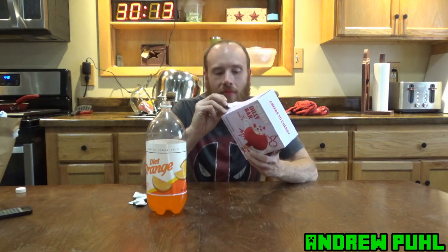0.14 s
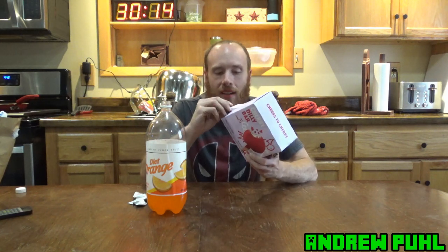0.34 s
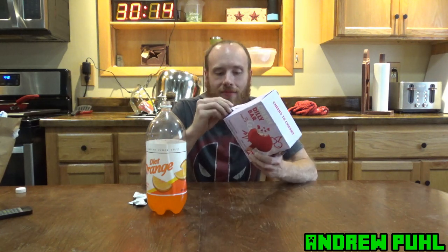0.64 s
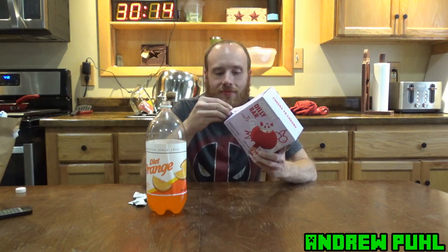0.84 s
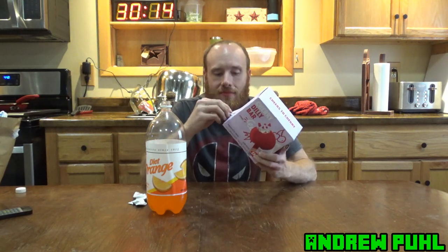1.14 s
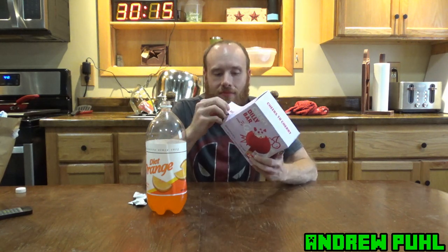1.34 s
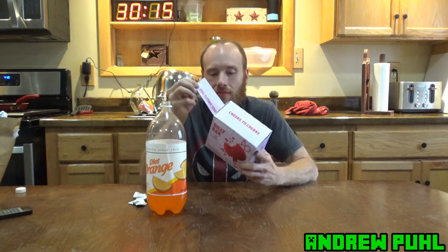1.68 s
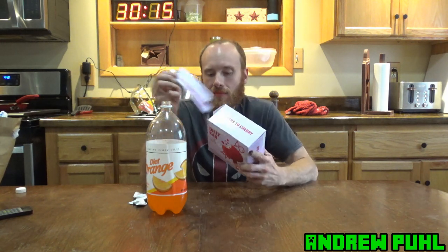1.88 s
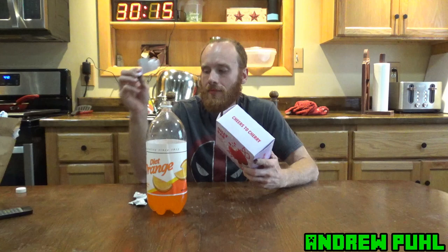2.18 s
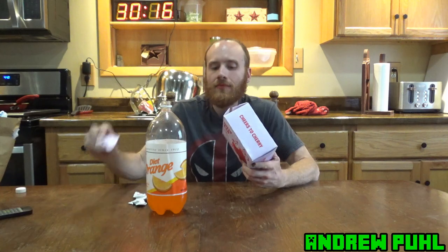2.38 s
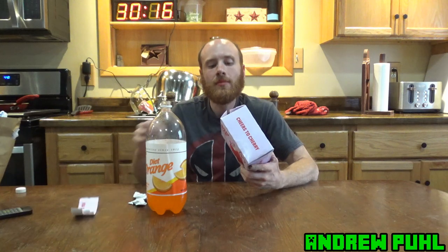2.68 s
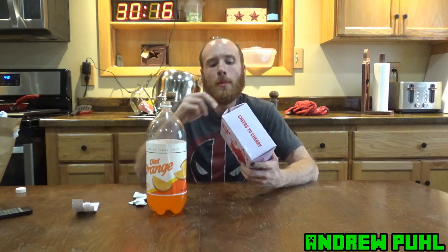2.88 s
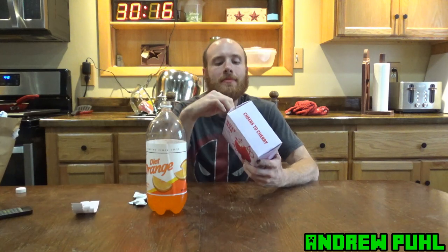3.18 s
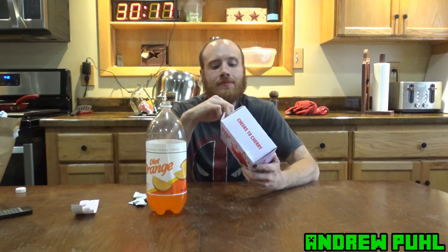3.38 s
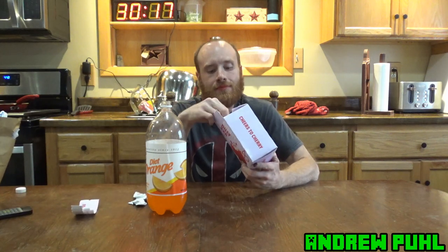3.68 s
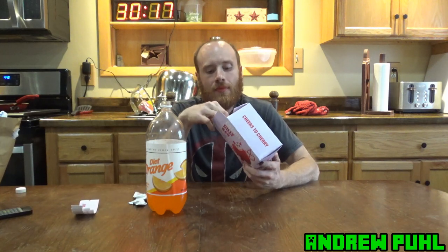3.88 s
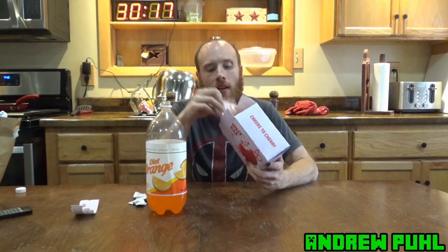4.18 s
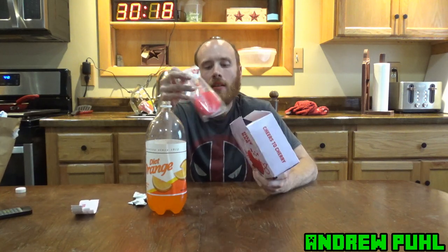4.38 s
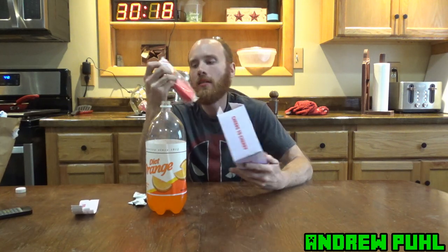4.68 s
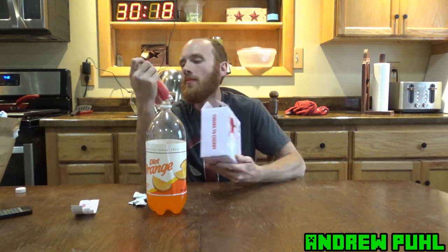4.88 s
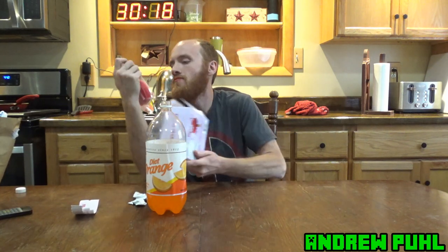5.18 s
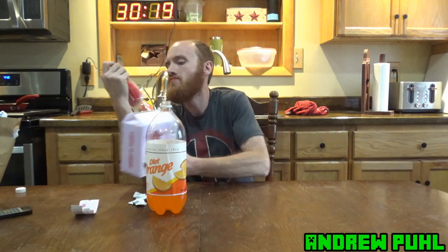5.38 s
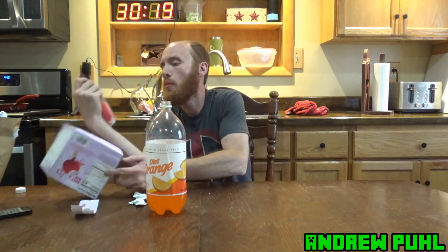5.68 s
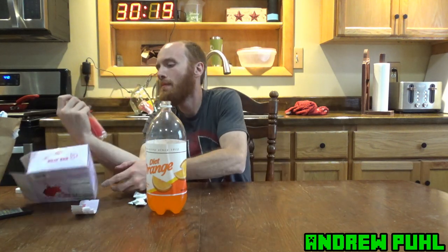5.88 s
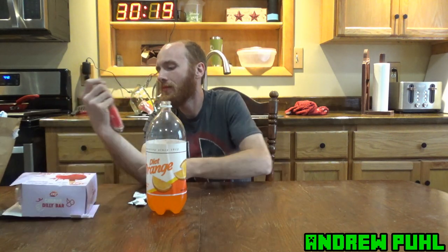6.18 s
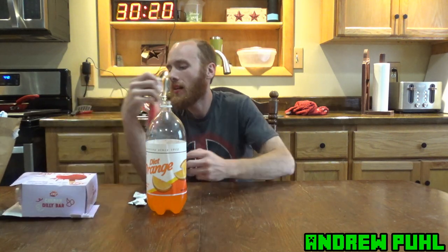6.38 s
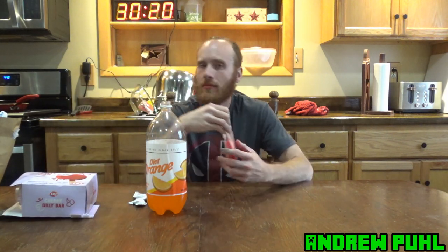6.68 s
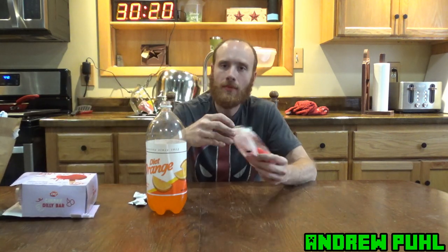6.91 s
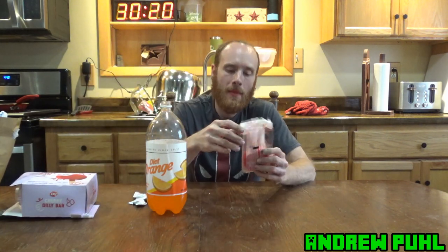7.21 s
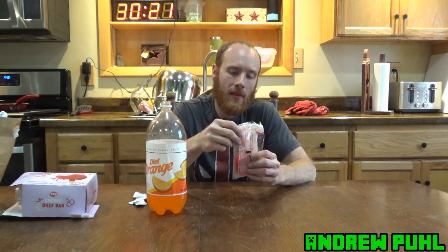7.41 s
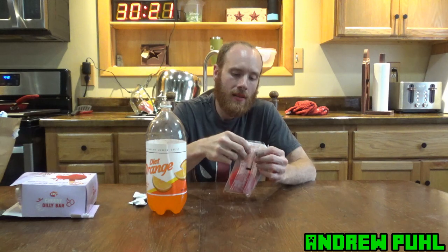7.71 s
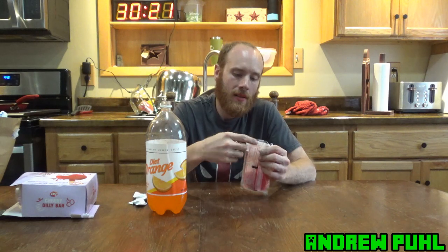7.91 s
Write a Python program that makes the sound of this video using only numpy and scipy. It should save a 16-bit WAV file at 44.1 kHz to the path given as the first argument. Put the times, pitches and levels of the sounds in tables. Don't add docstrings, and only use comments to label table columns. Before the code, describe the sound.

Card taps, a quick ripping burst, crisp wrapper crackle, a box landing and scraping on a table, then more busy film crinkling, close and indoors.

```python
import sys
import numpy as np
from scipy import signal
from scipy.fft import rfft, irfft, next_fast_len
from scipy.io import wavfile
from scipy.ndimage import map_coordinates

SR = 44100
rng = np.random.default_rng(int(sys.argv[2]) if len(sys.argv) > 2 else 0)


def log_audio(samples):
    frames = np.atleast_2d(samples).T
    limited = np.clip(frames, -1, 1)
    pcm = np.round(limited * 32767).astype(np.int16)
    wavfile.write(sys.argv[1], SR, pcm)


def volts_from_db(level):
    exponent = np.asarray(level, float) / 20
    return 10 ** exponent


N = 355005

# [f/Hz, level/dB per Hz]
GRIT_COLOUR = [(500, -18), (1200, 0), (2200, 10), (3500, 2.5), (6000, 4.5), (9000, -1), (12000, -18),
               (16500, -103)]


def unit(x):
    return x / np.sqrt(np.mean(x ** 2) + 1e-20)


def along(points, hz):
    f, v = np.transpose(points)
    return np.interp(np.log(hz + 1), np.log(f + 1), v)


def wobble(rate):
    at = np.arange(0, N + 64, 64)
    knots = rng.standard_normal(int(N * rate / SR) + 4)
    return np.interp(np.arange(N), at, map_coordinates(knots, [at * rate / SR]))


def filtered(x, response):
    m = next_fast_len(N + SR // 2)
    return irfft(rfft(x, m) * response(np.fft.rfftfreq(m, 1 / SR)), m)[..., :N]


def causal(points):
    def response(f):
        cepstrum = irfft(along(points, f) * np.log(10) / 20)
        cepstrum[1:len(cepstrum) // 2] *= 2
        cepstrum[len(cepstrum) // 2 + 1:] = 0
        return np.exp(rfft(cepstrum))
    return response


def body(modes):
    def response(f):
        total = 0
        for k, (centre, width, db) in enumerate(modes):
            damping = 1j * f * width
            total = total + (-1) ** k * volts_from_db(db) * damping / (centre * centre - f * f + damping)
        return total
    return response


def resonant(noise, hz, width):
    return unit(signal.lfilter(*signal.iirpeak(min(hz, SR / 3), 1 / width, SR), noise))


def grains(per_s, spread_db, clump_db, life):
    strength = np.minimum(rng.exponential(size=N), 2.2)
    happens = rng.random(N) < per_s / SR
    size = volts_from_db(spread_db * strength + clump_db * wobble(40)) * happens
    puff = signal.lfilter([1], [1, -np.exp(-1 / (life * SR))], size)
    return unit(puff * rng.standard_normal(N) / np.sqrt(per_s))


def strokes(rows, rise_db_s, fall_db_s):
    s = np.arange(0, N / SR, 1 / 2000)
    power = 0
    for at, hold, db in rows:
        rise = rise_db_s * np.maximum(at - s, 0)
        fall = fall_db_s * np.maximum(s - at - abs(hold), 0)
        power = power + volts_from_db(db - rise - fall) ** 2
    return np.interp(np.arange(N) / SR, s, np.sqrt(power))


def air():
    # [f/Hz, level/dB per Hz]
    air_colour = [(12, -36), (20, -3.5), (48, -12.5), (79, -5.5), (139, -8), (230, -5.5), (506, -10.5),
                  (1690, -15.5), (7100, -22), (7730, -23), (10800, -28), (15200, -27.5), (16500, -35)]
    # [f/Hz, level/dB rms]
    hum_partials = [(120, -66), (242, -89)]
    noise = rng.standard_normal((2, N))
    mid, side = filtered(noise, lambda f: volts_from_db(along(air_colour, f)) * [1 + 0 * f, f / (f + 45)])
    tone = volts_from_db(-58.5 + 0.29 * wobble(4.79)) * unit(np.array([mid + side / 2, mid - side / 2]))
    t = np.arange(N) / SR
    hum = sum(volts_from_db(db - 10 + 0.8 * wobble(7.2)) * np.sin(2 * np.pi * hz * t) for hz, db in hum_partials)
    return tone + hum


def panels(f):
    # [f/Hz, width/Hz, level/dB]
    box_modes = [(240, 273, -7.5), (389, 208, -2.5), (700, 330, -6.5), (1100, 336, -5.5),
                 (1358, 730, -12.5), (2200, 105, -18.5)]
    return body(box_modes)(f) * body([(750, 3500, 0)])(f)


def cracks(events, life, width, settle_db, settle, boom_life, boom_db):
    # [f/Hz, level/dB]
    edge_colour = [(600, -16.5), (1500, -6), (3000, -2), (9500, -1.5), (12000, -14.5), (16500, -15.5)]
    crack, push, t = np.zeros(N + SR), np.zeros(N + SR), np.arange(SR // 16) / SR
    for s, db, rel_db, hz, boom_hz in events:
        snap, shove, rustle = rng.standard_normal((3, len(t)))
        start = round(s * SR)
        second_hz = hz * 1.81 ** np.sign(6500 - hz)
        burst = resonant(snap, hz, width) + 0.37 * resonant(snap, second_hz, width) + 0.41 * snap
        burst = burst * t * np.exp(-t / life)
        after = volts_from_db(settle_db) * rustle * np.exp(-t / settle) * (1 - np.exp(-t / 0.00013))
        crack[start:][:len(t)] += volts_from_db(db) * (burst / np.abs(burst).max() + after)
        decay = np.exp(-t / boom_life) + 0.11 * np.exp(-t / (4 * boom_life))
        shake = resonant(shove, boom_hz, 0.24) * (1 - np.exp(-t / 0.00019)) * decay
        push[start:][:len(t)] += volts_from_db(db + rel_db + boom_db) * shake / np.linalg.norm(shake)
    return filtered(crack[:N], causal(edge_colour)) + filtered(push[:N], panels)


def card():
    # [t/s, crack peak level/dB, box boom over crack/dB, crack f/Hz, boom f/Hz]
    taps = [(0.0772, -27, 4, 3080, 1200), (0.2186, -21, -10, 3900, 970), (0.234, -8, 3, 2200, 1250),
            (0.3502, -14, -15.5, 5400, 1150), (0.63, -37.5, 0, 2450, 700), (0.6534, -32.5, -10, 6140, 610),
            (0.7113, -32, 1, 2500, 700), (0.9247, -35, 9, 4400, 646), (0.943, -37, 13.5, 5750, 690),
            (0.9687, -36.5, 7, 5270, 735), (1.078, -42, 6, 2400, 626), (1.3456, -33.5, -3.5, 2540, 1150),
            (1.3783, -36, -25, 5910, 692)]
    tabs = [(1.4434, -10, 0.5, 2860, 610), (1.4831, -8.5, -0.5, 2550, 680), (1.5259, -14, 1.5, 2360, 626),
            (1.549, -17, -20, 5600, 900), (1.5557, -6.5, -6.5, 5900, 555), (1.5856, -6, -4, 6050, 630),
            (1.6146, -9, -11, 4840, 650), (1.6434, -8.5, -1, 2260, 665), (1.6724, -7.5, -7, 2300, 700),
            (1.703, -10, -5, 2370, 660), (1.7552, -9.5, -4, 2850, 700), (1.8025, -6, -29, 5940, 519),
            (1.8362, -12, 0, 2900, 746), (1.9325, -6, -22, 2600, 700), (1.956, -8, -0.5, 2500, 764),
            (1.903, -11.5, 1.5, 3000, 700), (1.983, -15, -12, 2480, 700), (2.171, -35, -20, 6000, 700)]
    knocks = [
        (2.1415, -29.5, -11, 5070, 1260),
        (2.4164, -39.5, -15, 5580, 357),
        (2.5793, -22, -14, 3400, 500),
        (3.1479, -34, -5, 2200, 756),
        (3.1914, -26, 2, 1910, 745),
        (3.2803, -33.5, 7.5, 2460, 640),
        (3.322, -31.5, -5, 2300, 638),
        (3.533, -40, 4.5, 2400, 750),
        (3.5123, -34, -19, 6810, 736),
        (5.678, -25.5, 15.5, 2500, 407),
    ]
    jolts = [(5.6834, -14.5, -6, 5270, 315), (5.7144, -20.5, 9, 2200, 223), (5.7264, -16.5, 2, 3490, 242),
             (5.7594, -10.5, -10, 1500, 810), (5.8924, -30, 7, 1570, 910), (5.9444, -22, 12, 2010, 206),
             (5.9634, -18, 5, 2340, 690), (6.0114, -29, -6, 2100, 845), (6.0924, -10, -14, 2540, 635),
             (6.1064, -11, -0.5, 2970, 616), (6.1174, -8.5, 4.5, 1500, 1020), (6.1364, -18, 8, 2250, 511),
             (6.1504, -16.5, 4, 1670, 616), (6.19, -18, -10, 3300, 657), (6.2644, -40, -6, 3180, 501)]
    fidgets = [(0.4743, -34, -12, 5160, 670), (0.4894, -38, -2.5, 5400, 759), (0.6844, -46, 3, 2530, 651),
               (0.7444, -40.5, 3, 5680, 700), (0.7746, -38.5, 1, 5790, 511), (0.8194, -38, 1, 6100, 506),
               (0.8624, -41.5, 2, 3710, 673), (0.999, -51, 5, 1500, 541), (5.099, -45.5, 7.5, 2050, 840),
               (5.1801, -36, 4, 6910, 746), (5.25, -50, -4, 1680, 600), (5.3677, -31.5, 2, 5570, 721),
               (5.4194, -35.5, 8, 2850, 720), (5.469, -41, 6, 3700, 915), (5.5194, -32, 2, 2410, 705)]
    events = list(taps) + list(tabs) + list(knocks) + list(jolts) + list(fidgets)
    hits = cracks(events, life=0.0011, width=0.27, settle_db=-16.5, settle=0.011,
                  boom_life=0.0046, boom_db=22.0)
    return filtered(hits, lambda f: 1 / (1 + 1j * f / 15800) ** 2)


def damped_rings(events):
    ring, t = np.zeros(N + SR), np.arange(SR // 30) / SR
    for s, db, hz in events:
        tone = np.exp(-t * hz / 3.5) * np.sin(2 * np.pi * hz * t)
        ring[round(s * SR):][:len(t)] += volts_from_db(db - 3.5) * tone
    return ring[:N]


def flicks():
    # [t/s, peak level/dB, f/Hz]
    short_rings = [(0.077, -31, 1180), (0.077, -32, 1900), (0.077, -35, 450), (0.2343, -13.5, 700),
                   (0.2345, -7.5, 2180), (0.236, -15, 1440), (0.2455, -20, 1270), (1.591, -17, 646),
                   (1.638, -18, 720), (1.647, -20, 700), (1.679, -15.5, 710), (1.709, -18, 713),
                   (2.315, -44, 950), (2.35, -47, 1250), (5.6825, -15, 443), (5.713, -23, 326)]
    return damped_rings(short_rings)


def brushes():
    # [t of the middle/s, level/dB rms, length/s]
    swells = [
        (0.133, -58, 0.064),
        (0.382, -43, 0.011),
        (0.479, -51.5, 0.037),
        (0.813, -55, 0.016),
        (2.714, -60, 0.011),
        (1.869, -36, 0.023),
    ]
    s = np.arange(N) / SR
    swell = sum(volts_from_db(db) * np.exp(-((s - at) / length) ** 2) for at, db, length in swells)
    fibre = grains(2200, spread_db=2, clump_db=3, life=0.0007)
    return swell * unit(filtered(fibre, causal(GRIT_COLOUR)))


def crackle(per_s):
    # [f/Hz, level/dB per Hz]
    film_colour = [(880, -46), (1500, -11), (2540, -8), (4890, -0.5), (7820, -1.5), (9600, -6.5),
                   (10800, -11.5), (15500, -23)]
    facets = [3270, 5700, 8500]
    colour = causal(film_colour)
    total = np.zeros(N)
    for hz in facets:
        slips = grains(per_s, spread_db=3.8, clump_db=2.5, life=.0006)
        total += filtered(slips, lambda f: colour(f) * (1.9 + body([(hz, .6 * hz, 0)])(f)))
    return unit(total)


def hands():
    # [t/s, hold/s, crackle level/dB, card over crackle/dB]
    tugs = [(.24, 0.097, -50, 8.5), (.47, 0.027, -59, 1.5), (.7, 0.16, -57, -2), (.93, 0.051, -61.5, 14.5),
            (1.08, 0.0098, -66.5, 14), (1.38, 0.066, -45.5, -11), (1.46, 0.12, -35, -1),
            (1.56, 0.09, -30.5, 2.5), (1.66, .12, -31.5, -3.5), (1.895, 0.026, -21.5, -28),
            (2.04, 0.21, -57.5, -1.5), (2.2, 0.26, -66, 8.5), (3.2, 0.2, -65, 13.5), (3.5, 0.038, -57.5, 5),
            (3.58, 0.094, -49.5, -3.5), (3.68, 0.01, -44, 4), (3.81, 0.025, -46, 2.5)]
    # [t/s, hold/s, crackle level/dB, card over crackle/dB]
    grips = [(3.895, 0.051, -30.5, -9.5), (4.006, 0.0071, -28, -15), (4.082, 0.037, -25, -8.5),
             (4.181, 0.036, -23.5, -10), (4.245, 0.056, -17.5, -14), (4.304, 0.058, -19.5, -13.5),
             (4.45, 0.14, -24.5, -17), (4.625, 0.071, -25, -20), (4.759, 0.083, -27.5, -15),
             (4.915, 0.13, -33.5, -12), (5.074, 0.22, -49.5, -0.5), (5.177, 0.012, -37.5, -11.5),
             (5.352, 0.11, -41.5, -3), (5.495, 0.074, -33.5, -7), (5.607, 0.033, -29.5, -8.5),
             (5.787, 0.35, -37, -3), (6.361, 0.0078, -30.5, -5.5), (6.44, 0.082, -40, -6),
             (6.59, 0.11, -28, -16.5), (6.77, 0.14, -23, -18), (6.931, 0.011, -27, -11.5),
             (7.052, 0.051, -37.5, -9), (7.178, 0.0053, -32, -6), (7.26, 0.01, -30.5, -52),
             (7.355, 0.016, -27, -12.5), (7.458, 0.07, -26, -12.5), (7.617, 0.22, -34, -14.5),
             (7.761, 0.049, -24, -13), (7.844, 0.09, -26, -15), (7.948, 0.085, -22.5, -16.5)]
    # [f/Hz, level/dB per Hz]
    scrape_colour = [(500, -13.5), (1000, -5), (2200, 1), (3500, -1.5), (6000, -33)]
    rise_db_s, fall_db_s = 546, 223

    def gain(card_share):
        rows = [(s, hold, db + card_share * rel_db) for s, hold, db, rel_db in list(tugs) + list(grips)]
        return volts_from_db(-94) + strokes(rows, rise_db_s, fall_db_s)

    tug = strokes([row[:3] for row in tugs], rise_db_s, fall_db_s)
    grip = strokes([row[:3] for row in grips], rise_db_s, fall_db_s)
    slips_per_s = 450 * (1 + 7 * (tug / gain(0)) ** 2 + (grip / volts_from_db(-24)) ** 2)
    fine = crackle(slips_per_s)
    rub = unit(filtered(grains(1500, spread_db=2.5, clump_db=1.2, life=.002), panels))
    scrape = unit(filtered(grains(1600, spread_db=2.8, clump_db=1.8, life=.001), causal(scrape_colour)))
    return volts_from_db(-7.5) * gain(0) * fine + volts_from_db(-5.0) * gain(1.0) * rub + volts_from_db(-8.0) * gain(0.46) * scrape


def slides():
    # [f/Hz, width/Hz, level/dB]
    table_modes = [(95, 27, -5), (177.6, 53, 3.5), (238, 97, 3.5)]
    # [t/s, hold/s, body level/dB, thud over body/dB, hiss over body/dB]
    drags = [
        (1.873, 0.087, -35.5, -34, -1),
        (1.941, 0.016, -32.5, -9.5, -15),
        (2.58, 0.014, -56.5, 0.5, 7.5),
        (3.191, 0.013, -47.5, -0.5, -12),
        (5.678, 0.054, -29.5, -3, 1.5),
        (5.946, 0.041, -29.5, -28, 2),
        (6.088, 0.048, -23, -14, -2.5),
        (6.185, 0.024, -34, -19, 5),
        (5.854, 0.11, -50, -23, -15),
        (6.233, 0.019, -44, -13, -9),
    ]
    slips = grains(2500, spread_db=2.5, clump_db=.6, life=0.001)
    thud = unit(filtered(slips, lambda f: body(table_modes)(f) ** 2))
    box = unit(filtered(slips, panels))
    hiss = unit(filtered(slips, causal(GRIT_COLOUR)))
    s, hold, db, thud_db, hiss_db = np.transpose(drags)

    def gain(level):
        return strokes(zip(s, hold, level), rise_db_s=5000, fall_db_s=217)

    return gain(db + thud_db) * thud + gain(db) * box + gain(db + hiss_db) * hiss


def bumps():
    # [t of the middle/s, peak level/dB, f/Hz]
    pushes = [
        (1.98, -56, 99),
        (2.01, -61, 33),
        (2.26, -58.5, 91.5),
        (3.35, -59, 27),
        (5.959, -65, 118),
        (6.14, -37.5, 95.5),
        (6.22, -52, 38),
        (6.25, -46, 100),
        (7.05, -64, 85),
        (7.38, -58, 100),
    ]
    push, t = np.zeros(N), np.arange(-SR // 4, SR // 4) / SR
    for s, db, hz in pushes:
        swell = np.exp(-(t * hz / 3.1) ** 2)
        push[round(s * SR) - SR // 4:][:len(t)] += volts_from_db(db) * swell * np.sin(2 * np.pi * hz * t)
    return push


def hollow_knock():
    # [t/s, peak level/dB]
    knocks_on_bottle = [
        (2.184, -50),
        (2.211, -49),
        (2.2343, -34.5),
        (2.2391, -37),
        (2.249, -31),
        (2.26, -35),
        (2.274, -41),
        (2.29, -44),
        (2.335, -47.5),
    ]
    # [f/Hz, width/Hz, level/dB]
    hollow_modes = [(182, 31, 4), (284, 34, 8.5), (443, 40, -12), (1210, 110, -15), (1694, 37, -2),
                    (1900, 100, -10)]
    slips = np.zeros(N)
    for s, db in knocks_on_bottle:
        slips[round(s * SR)] = volts_from_db(db + 41.0)
    return filtered(slips, lambda f: body(hollow_modes)(f) * body([(700, 3000, 0)])(f) ** 2)


def neighbours(snaps):
    extra = []
    for s, db, rel_db, hz, boom_hz in snaps:
        a, b, c = rng.uniform(-1, 1, 3)
        extra.append((s + .007 * (a - 1 / 5), db - 17 + 4 * b, rel_db, hz * 2 ** (c / 2), boom_hz))
    return snaps + extra


def film():
    # [t/s, crack peak level/dB, crack f/Hz]
    pulled = [(3.8077, -19.5, 7150), (3.8736, -17.5, 4070), (3.9034, -17.5, 4100), (3.9192, -11.5, 5700),
              (3.939, -12, 6700), (4.0058, -14.5, 6000), (4.067, -11, 8400), (4.0975, -9.5, 5600),
              (4.1779, -14, 6100), (4.1964, -17, 8020), (4.2587, -8, 6140), (4.281, -2.5, 5600),
              (4.29, -9.5, 6140), (4.3254, -8, 4910), (4.3533, -7.5, 6900), (4.4176, -15, 6980),
              (4.4262, -6, 5950), (4.455, -18, 5740), (4.4723, -3.5, 4900), (4.4985, -8, 5700),
              (4.5108, -4.5, 6240), (4.5518, -3.5, 5700), (4.5852, -10.5, 9000), (4.6305, -11, 4820),
              (4.648, -2.5, 5250), (4.6567, -5.5, 4800), (4.6828, -6.5, 8900), (4.7634, -13.5, 6230),
              (4.7723, -7, 6360), (4.9228, -8.5, 5860)]
    further = [(4.249, -15, 5600), (4.2736, -8, 5800), (4.336, -4, 5200), (4.3322, -4, 5000),
               (4.3658, -23, 5470), (4.378, -16, 5280), (4.385, -14, 5050), (4.442, -22, 5490),
               (4.4663, -14, 5170), (4.4875, -11, 8300), (4.5542, -8, 9000), (4.567, -20, 4900),
               (4.599, -13, 6190), (4.625, -21, 4830), (4.6946, -19, 4840), (4.7054, -22, 5520),
               (4.7556, -27, 7200), (3.772, -35, 8000), (4.081, -20, 8000), (4.898, -18.5, 4420),
               (5.023, -25, 9180), (7.259, -28, 8500), (6.5933, -21, 5970), (6.7, -21, 3440),
               (6.7956, -12, 7910), (6.8724, -18, 5690), (6.8998, -8, 6170), (7.6882, -13, 6950),
               (7.7809, -12, 4820), (7.837, -7.5, 6850), (7.8458, -17, 4350), (7.982, -13, 6300),
               (7.999, -12.5, 6140)]
    carried = [
        (4.975, -15, 4900),
        (5.3237, -21.5, 7440),
        (5.5608, -27, 6700),
        (5.601, -16, 6300),
        (6.0791, -18, 4370),
        (6.197, -13.5, 7000),
        (6.2193, -19, 4160),
        (6.3656, -27, 5100),
        (6.466, -15.5, 5130),
    ]
    turned = [(6.5962, -14.5, 4700), (6.612, -11.5, 5900), (6.627, -5.5, 4550), (6.638, -9.5, 3850),
              (6.6569, -7, 5130), (6.6819, -4, 5900), (6.714, -11, 3800), (6.75, -18, 4670),
              (6.7636, -8.5, 7700), (6.783, -4.5, 8000), (6.8084, -7.5, 7800), (6.8297, -22, 6100),
              (6.85, -9, 5700), (6.8794, -6, 5830), (6.8909, -7, 5060), (6.9117, -11.5, 6010),
              (6.945, -14, 4590), (6.966, -11, 5600), (6.9766, -6.5, 8300), (6.9922, -10, 6840),
              (7.0548, -11, 6000), (7.063, -16.5, 4510), (7.106, -16.5, 3800), (7.1736, -14.5, 6760),
              (7.182, -19, 7950), (7.255, -22, 6000), (7.263, -16, 7500), (7.2812, -17.5, 8500)]
    peeled = [(7.3559, -3, 6030), (7.38, -16, 6370), (7.384, -9, 6930), (7.442, -7.5, 5080),
              (7.4599, -12, 4940), (7.4732, -11.5, 4310), (7.4777, -0.5, 4460), (7.491, -8, 7600),
              (7.494, -12.5, 6570), (7.5213, -8, 7800), (7.574, -19.5, 4100), (7.6134, -20, 7400),
              (7.638, -24, 3760), (7.653, -16.5, 4400), (7.6853, -7.5, 7200), (7.7088, -17, 4850),
              (7.727, -18, 4500), (7.7442, -14, 5100), (7.7932, -5, 7400), (7.7971, -5.5, 8000),
              (7.8306, -9, 7300), (7.8703, -11.5, 7190), (7.898, -12, 4250), (7.926, -4, 4600),
              (7.9364, -9, 7040), (7.9506, -6.5, 5860), (7.9618, -6.5, 8500), (7.9697, -2, 5750),
              (8.006, -10.5, 6650)]
    snaps = [(s, db + 2, -30, hz, hz / 5)
             for part in (pulled, carried, turned, peeled, further) for s, db, hz in part]
    return cracks(neighbours(snaps), life=.00045, width=.28, settle_db=-14, settle=.003,
                  boom_life=.0025, boom_db=25)


def folds():
    # [t/s, peak level/dB, f/Hz]
    fold_pops = [(3.902, -30, 1140), (4.095, -22, 2410), (4.279, -22, 2500), (4.329, -23, 754),
                 (4.47, -16.5, 2430), (4.554, -19.5, 2030), (4.624, -17.5, 1610), (4.763, -17, 2180),
                 (4.923, -32, 2450), (6.635, -19, 2230), (6.682, -28, 1860), (6.766, -23, 1860),
                 (6.91, -19, 1680), (6.944, -24.5, 820), (6.966, -24, 2150), (7.053, -43, 2370),
                 (7.357, -33, 1950), (7.38, -27, 1900), (7.442, -43, 2230), (7.478, -22, 1410),
                 (7.52, -25, 2040), (7.614, -29, 1420), (7.654, -21, 1690), (7.687, -28.5, 1200),
                 (7.726, -21, 1900), (7.743, -30, 2130), (7.792, -22, 1520), (7.831, -23, 1730),
                 (7.871, -26, 830), (7.925, -19, 1590), (7.951, -23, 2270), (7.97, -17, 1590)]
    return damped_rings(fold_pops)


def bottle():
    # [t/s, peak level/dB]
    nicks = [
        (5.8, -17.5),
        (5.8117, -24),
    ]
    # [f/Hz, level/dB, t60/s]
    wall_modes = [(3370, -10, 0.023), (3800, 1, 0.012), (4040, -16, 0.038)]
    ring, t = np.zeros(N), np.arange(SR // 10) / SR
    for s, db in nicks:
        for hz, level, t60 in wall_modes:
            ring[round(s * SR):][:len(t)] += volts_from_db(db + level - 60 * t / t60) * np.sin(2 * np.pi * hz * t)
    return ring


def kitchen(x):
    # [f/Hz, t60/s]
    room_decay = [(200, 0.23), (1400, 0.25), (4000, 0.18), (10000, 0.17)]
    wet, part = np.zeros((2, N + SR)), SR // 4
    for start in range(0, N, part):
        hz, t, z = signal.stft(rng.standard_normal((2, SR // 2)), SR, nperseg=256)
        decay = volts_from_db(-60 * t / along(room_decay, hz)[:, None])
        shared, differing = signal.istft(z * decay, SR, nperseg=256)[1]
        tail = shared + 0.34 * differing * [[1], [-1]]
        answer = signal.fftconvolve(x[None, start:start + part], tail / np.linalg.norm(tail[0]), axes=1)
        wet[:, start + 130:][:, :answer.shape[1]] += answer
    return wet[:, :N]


def scene():
    # [t/s, left over right/dB]
    lean = [(0, -0.5), (5.2, 0.5), (5.6, 2), (6.3, 3.5), (6.6, 0.5), (8.05, -1)]
    light = card() + flicks() + brushes() + hands() + film() + folds()
    light = filtered(light, lambda f: (1j * f / (1j * f + 140)) ** 2)
    near = light + slides() + hollow_knock() + bottle()
    s, left_db = np.transpose(lean)
    lean_db = np.interp(np.arange(N) / SR, s, left_db) / 2
    wet = kitchen(near) * volts_from_db(-8.0)
    mid, side = (wet[0] + wet[1]) / 2, (wet[0] - wet[1]) / 2
    side = filtered(side, lambda f: 1.98 * f / (f + 400) + 0.093 * f / 10000)
    return bumps() + near * volts_from_db([lean_db, -lean_db]) + mid + side * [[1], [-1]] + air()


def roll_off(x):
    return signal.sosfilt(signal.butter(12, 16660, fs=SR, output="sos"), x)


def record(dry):
    rounded = dry / (1 + np.abs(dry / .56) ** 4) ** (1 / 4)
    limited = filtered(rounded, lambda f: f < 15800)
    return roll_off(limited)


dry = scene()
out = record(dry)
log_audio(out)
```